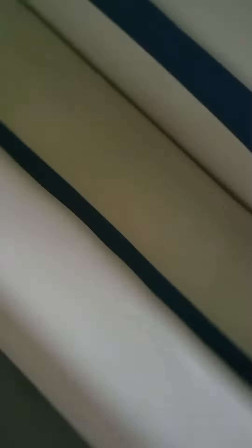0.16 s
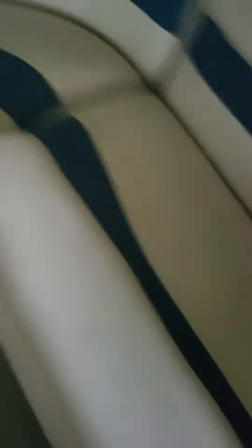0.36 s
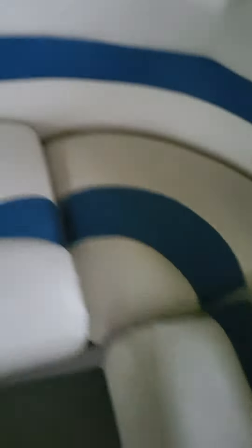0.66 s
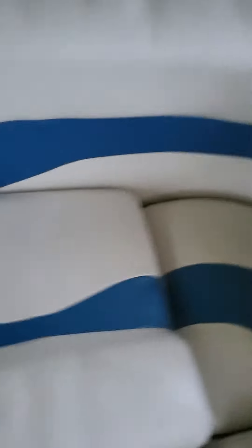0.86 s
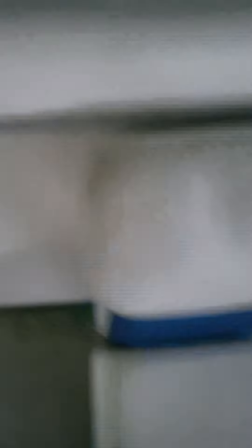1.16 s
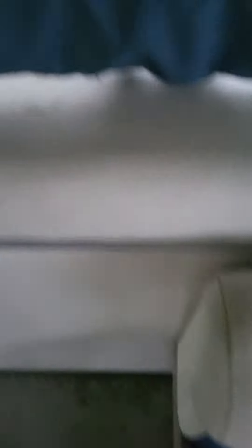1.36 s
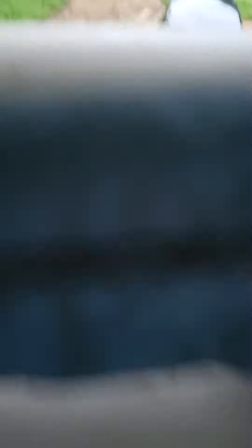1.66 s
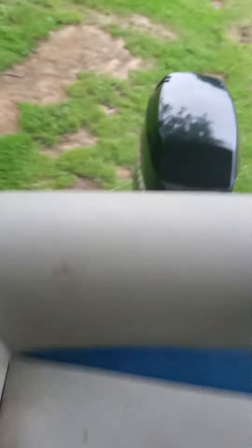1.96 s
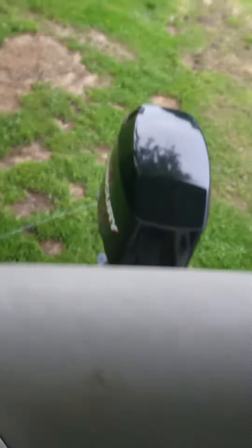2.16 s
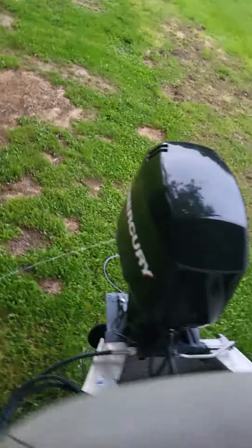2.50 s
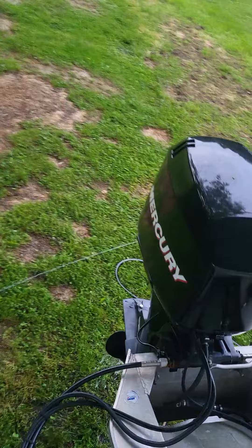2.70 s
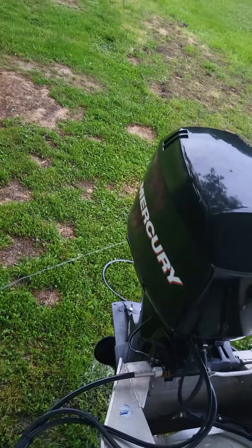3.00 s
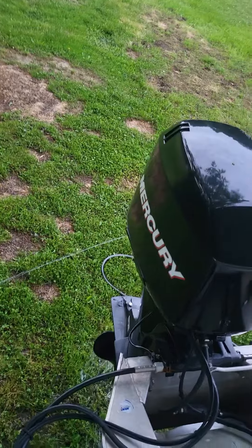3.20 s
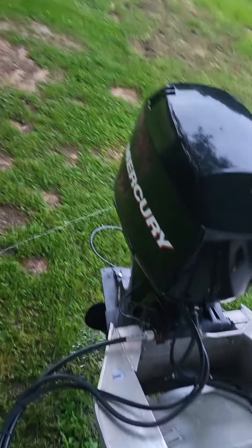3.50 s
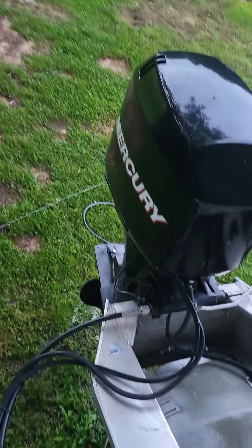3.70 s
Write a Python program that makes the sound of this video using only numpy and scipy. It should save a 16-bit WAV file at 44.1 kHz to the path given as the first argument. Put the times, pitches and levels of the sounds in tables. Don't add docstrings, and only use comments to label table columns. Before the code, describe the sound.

A boat outboard motor idles steadily, throbbing low with clattering metal, watery gurgles and hiss.

```python
import sys
import numpy as np
from scipy import signal
from scipy.fft import rfft, irfft, next_fast_len
from scipy.io import wavfile
from scipy.ndimage import uniform_filter1d

SR = 44100
rng = np.random.default_rng(int(sys.argv[2]) if len(sys.argv) > 2 else 0)


def digitize_waveform(pressure):
    field = np.atleast_2d(pressure).T
    bounded = np.clip(field, -1, 1)
    quanta = np.round(bounded * 32767).astype(np.int16)
    wavfile.write(sys.argv[1], SR, quanta)


def ratio(d):
    e = np.asarray(d, float) / 20
    return 10 ** e


N = 169785

# pulse level in dB, lateness in firings, clatter level in dB.
CYLINDERS = [
    (0, 0, -1),
    (.6, .006, -1),
    (0, 0, 0),
    (-.6, -.006, -4),
]
# time in seconds, exhaust heard straight in dB, boom of the hull in dB, machinery in dB.
ROUTE = [(0, -17.5, -21, -3.5), (.25, -32.5, -20.5, -4), (.45, -25, -17, -3), (.7, -25.5, -19.5, -3.5),
         (.95, -20.5, -22, -1.5), (1.3, -20.5, -22.5, -1), (1.55, -20.5, -19.5, -2), (1.9, -17, -22, -1),
         (2.15, -16, -24, 0.5), (2.45, -16, -23, 1), (2.8, -17.5, -22.5, 4), (3.3, -19, -21, 5.5),
         (3.85, -18, -22, 5)]
HALVES = np.array([[.5], [-.5]])


def unit(x):
    return x / np.sqrt(np.mean(x ** 2, -1, keepdims=True) + 1e-20)


def along(points, hz):
    f, db = np.transpose([(5, -90), *points, (points[-1][0] * 3, -90)])
    return ratio(np.interp(np.log(hz + 1), np.log(f + 1), db))


def curves(rows):
    s, *cols = np.transpose(rows)
    return [np.interp(np.arange(N) / SR, s, c) for c in cols]


def filtered(x, response):
    m = next_fast_len(N + SR // 2) // 2 * 2
    return irfft(rfft(x, m) * response(np.fft.rfftfreq(m, 1 / SR)), m)[..., :N]


def causal(points):
    def response(hz):
        c = irfft(np.log(along(points, hz)))
        c[1:len(c) // 2] *= 2
        c[len(c) // 2 + 1:] = 0
        return np.exp(rfft(c))
    return response


def resonance(hz, width):
    return lambda f: 1j * f * width / (hz * hz - f * f + 1j * f * width)


def noise(points, patchy_db=1.5):
    z = signal.stft(rng.standard_normal(N), nperseg=256)[2]
    field = uniform_filter1d(rng.standard_normal(z.shape), size=4, axis=0)
    field = uniform_filter1d(field, size=10, axis=1)
    x = signal.istft(z * ratio(patchy_db * field / field.std()), nperseg=256)[1][:N]
    return unit(filtered(x, lambda hz: along(points, hz)))


def pair(a, b, alike):
    u = np.arccos(np.clip(alike, 0, 1)) / 2
    return np.cos(u) * a + np.sin(u) * b * np.array([[1], [-1]])


def firings():
    # time in seconds, firings per second.
    speed = [(0.0, 24.95), (0.26, 26.19), (0.51, 26.36), (0.77, 26.0), (1.03, 26.48), (1.28, 26.46),
             (1.54, 26.5), (1.8, 26.18), (2.05, 26.06), (2.31, 26.18), (2.57, 26.42), (2.82, 26.74),
             (3.08, 26.11), (3.34, 27.06), (3.59, 26.95), (3.85, 25.17)]
    return np.cumsum(curves(speed)[0]) / SR


def bursts(bed, rise_s, fall_s, scatter_db):
    turn = firings() - 0.38 + 4
    k = turn.astype(int)
    s = (turn - k) / 26.4
    chance = np.sqrt(3) * rng.uniform(-1.57, 1, k[-1] + 1)
    size = ratio(np.array(CYLINDERS)[k % 4, 2] + scatter_db * chance[k])
    return unit(abs(bed) + 2 * size * (1 - np.exp(-s / rise_s)) * np.exp(-s / fall_s))


def rings(rows, gain_db, t60=.048, rough=.75, turn=np.pi / 2, left_db=0):
    out, t = np.zeros((2, N + SR)), np.arange(SR // 8) / SR
    fade = ratio(-60 * (t / t60) ** 1.4) * (1 - np.exp(-t / .004))
    for s, db, hz in rows:
        drift = rough * np.cumsum(rng.standard_normal((2, len(t))), 1) / 10
        ring = np.sin(2 * np.pi * hz * t + drift + [[0], [turn]]) * fade
        pan_db = (left_db + 5 * rng.standard_normal()) * HALVES
        out[:, round(s * SR):][:, :len(t)] += ratio(db + gain_db + pan_db) * 1.46 * ring
    return out[:, :N]


def exhaust():
    # frequency in Hz, level in dB.
    pipe = [(26, -25.5), (50, 7), (80, 4.5), (106, 5), (132, 3), (158, -10), (186, -24), (260, -34.5)]
    # frequency in Hz, width in Hz, level in dB.
    boom = [
        (72.4, 18.9, 1.5),
        (127.6, 5.4, 2.5),
        (179.9, 13, 5),
    ]
    pulse_place, jitter, scatter_db = 0.265, .006, .8
    lag_hz = 40
    lead = SR // 4
    k = np.arange(-4, 106)
    chance, own = rng.standard_normal((len(k), 2)), np.array(CYLINDERS)[k % 4]
    place = k + pulse_place + own[:, 1] + jitter * chance[:, 0]
    at = np.interp(place, np.r_[-6.3, firings()], np.r_[0, lead + np.arange(N)], right=0)
    size = ratio(own[:, 0] + scatter_db * chance[:, 1]) * (at > 0)
    pulses = np.bincount(at.astype(int), size, N + lead)

    def leg(f):
        return causal(pipe)(f) * (lag_hz - 1j * f) / (lag_hz + 1j * f)

    def hull(f):
        modes = [ratio(db) * resonance(hz, width)(f) for hz, width, db in boom]
        return leg(f) * sum((-1) ** i * mode for i, mode in enumerate(modes))

    def heard(response, lag_s, left_db):
        thump = filtered(np.arange(N) == 0, response)[:lead]
        x = unit(-signal.fftconvolve(pulses, thump)[lead:lead + N])
        return ratio(HALVES * left_db) * filtered(x[None], lambda hz: np.exp(2j * np.pi * hz * lag_s * HALVES))

    straight_db, boom_db, _ = curves(ROUTE)
    straight = ratio(straight_db) * heard(leg, lag_s=0.00014, left_db=1.6)
    return straight + ratio(boom_db) * heard(hull, lag_s=0.00037, left_db=1.5)


def clatter():
    # frequency in Hz, width in Hz, level in dB, left over right in dB.
    block = [(870, 61, -17, 15), (1070, 41, -7, 3), (1448, 41, -9, 0), (2234, 37, -11.5, -6),
             (2410, 145, -8.5, 1), (2603, 17, -14.5, 5.5), (3023, 36, -16, -3), (3380, 200, -17, 15),
             (3640, 47, -10.5, -7), (3950, 16, -12.5, -1.5), (4286, 230, -8.5, -3.5)]
    out = np.zeros((2, N))
    for hz, width, db, pan_db in block:
        gate = bursts(bed=.1, rise_s=.005, fall_s=.012, scatter_db=2.5)
        shake = gate * rng.standard_normal((2, N))
        sound = unit(filtered(shake, lambda f: resonance(hz, 2 * width)(f) ** 2))
        out += ratio(db + pan_db * HALVES) * pair(*sound, alike=0.028)
    return ratio(-41.5 + curves(ROUTE)[2]) * out


def tappet():
    # time in seconds, peak in dB, frequency in Hz, peak of the higher ring in dB.
    knocks = [(0.1023, -45, 1120, -63), (0.2523, -34, 1094, -38.5), (0.406, -34.5, 1193, -44),
              (0.555, -38, 1024, -41), (0.711, -29, 1110, -29.5), (0.8652, -25.5, 1085, -40),
              (1.0142, -38, 1070, -62), (1.163, -29, 1183, -39), (1.3139, -31.5, 1163, -63),
              (1.4653, -35, 1165, -56), (1.6212, -22, 1021, -38), (1.7749, -31, 1064, -33),
              (1.8869, -30, 1010, -46), (2.074, -31, 1140, -36.5), (2.2334, -38, 1115, -26.5),
              (2.38, -36, 1030, -34), (2.5306, -29, 1150, -34.5), (2.6817, -22, 1120, -30),
              (2.833, -18.5, 1075, -37), (2.984, -21, 1052, -35.5), (3.1316, -26, 1043, -45),
              (3.2875, -24.5, 1040, -34), (3.43, -24.5, 1080, -47), (3.583, -24, 990, -33),
              (3.7328, -22, 1040, -26)]
    # time in seconds, peak in dB, frequency in Hz.
    pings = [(2.174, -28, 812), (2.5, -27.5, 2600), (1.6, -26, 2650), (1.3, -25, 1600), (0.44, -30, 1400),
             (0.81, -33, 1300), (1.9, -42, 2700), (2.7, -22, 2330), (1.4, -29, 2200), (1.9, -25.5, 2326),
             (2.7, -25.5, 2400), (4.6, -30, 2380), (3.4, -34, 2330), (2.99, -42, 2400)]
    low = [row[:3] for row in knocks]
    upper = [(s + 0.0037, db + 4.5, 2384) for s, _, _, db in knocks]
    return rings([*low, *upper, *pings], gain_db=0)


def cowl_rattles():
    # time in seconds, peak in dB, frequency in Hz.
    rattles = [(0.828, -44, 4270), (1.5145, -26, 3620), (2.3096, -27, 3670), (2.3835, -29, 3640),
               (2.4887, -27, 4230), (2.6155, -31, 3600), (2.7641, -35, 3700), (2.8384, -27, 3970),
               (2.9178, -36, 3930), (2.9527, -30, 3670), (2.9911, -26, 3610), (3.0649, -24, 3480),
               (3.1088, -22.5, 4220), (3.2216, -23, 3650), (3.2919, -26.5, 3970), (3.3348, -25, 3600),
               (3.3702, -23, 3640), (3.4436, -25, 4260), (3.5887, -30, 4360), (3.8152, -32, 3650)]
    return rings(rattles, gain_db=-6, rough=0.95, left_db=-8)


def linkage_clinks():
    # time in seconds, peak in dB, frequency in Hz.
    clinks = [(1.3239, -46, 1400), (1.926, -36.5, 1394), (2.0408, -39, 1460), (2.162, -32, 1600),
              (2.2408, -33, 1420), (2.2734, -37, 1464), (2.9556, -36, 1450), (3.07, -36, 1460),
              (3.1363, -30, 1413), (3.586, -30, 1404), (3.701, -54, 1520), (3.7366, -34, 1390)]
    return rings(clinks, gain_db=2.5)


def valve_spits():
    # time in seconds, peak in dB, frequency in Hz.
    spits = [(2.1591, -24.5, 7080), (2.4235, -27, 6580), (2.5023, -25.5, 6610), (2.6145, -30, 6280),
             (2.8001, -24.5, 5830), (2.9164, -21.5, 5700), (3.0326, -22.5, 6130), (3.1443, -31, 5570),
             (3.2212, -27.5, 6450), (3.2975, -24, 6020), (3.3324, -23, 6500), (3.4023, -27, 6130),
             (3.4816, -24.5, 6600), (3.5145, -22, 6000)]
    return rings(spits, gain_db=-4.5, rough=2.48, left_db=-8)


def gas_burps():
    # time in seconds, peak in dB, frequency in Hz.
    burps = [(0.79, -36, 448), (0.937, -36, 377), (1.051, -25, 388), (1.205, -31.5, 373),
             (1.391, -25.5, 460), (1.808, -27, 404), (1.847, -25, 447), (1.927, -24, 434),
             (1.997, -26.5, 457), (2.042, -29, 393), (2.088, -27.5, 450), (2.152, -24, 392),
             (2.187, -38, 406), (2.24, -28, 444), (2.347, -32, 377), (2.414, -32, 359), (2.496, -31, 347),
             (3.06, -32, 447), (3.215, -29, 460), (3.364, -26, 450), (3.663, -21, 468), (3.745, -33, 416)]
    return rings(burps, gain_db=-4, t60=0.11, rough=.375, turn=np.pi / 8)


def gurgle():
    # frequency in Hz, level in dB per Hz.
    churn_colour = [(150, -0.5), (330, -9), (520, -6.5), (600, -14), (900, -14), (2000, -25.5)]
    # frequency in Hz, width in Hz.
    leg_modes = [
        (278, 33.6),
        (395, 118),
        (462, 34),
    ]
    # time in seconds, then the level of each of the three resonances in dB.
    leg_heard = [(0, -17, -2.5, -0.5), (.8, -1, 2, 2), (1.1, -9, 5, -4), (1.7, -4.5, 6, 7),
                 (2.3, -20, 11.5, -1.5), (2.6, 5, 0.5, -4), (3.2, 3, -4, 4), (3.85, 2.5, 0, 11)]
    alike = 0.66

    def swell(scatter_db):
        return bursts(bed=.35, rise_s=.004, fall_s=.015, scatter_db=scatter_db)

    churn = pair(noise(churn_colour, patchy_db=1), noise(churn_colour, patchy_db=7.5), alike)
    out = swell(1.2) * ratio(-41 + curves(ROUTE)[2]) * churn
    for (hz, width), db in zip(leg_modes, curves(leg_heard)):
        shake = swell(1.5) * rng.standard_normal((2, N))
        tone = unit(filtered(shake, lambda f: resonance(hz, width)(f) ** 2))
        out += ratio(-47 + db) * pair(*tone, alike)
    return out


def hiss():
    # time in seconds, hiss in dB, dullness of the right port from 0 (bright) to 1 (dull).
    facing = [(0, 0, 0.03), (.3, 3.5, 0.018), (1.02, 1, 0.091), (1.15, 1.5, 0.39), (1.55, 1.5, 0.55),
              (1.65, 4, 0.02), (2.04, 4.5, 0.18), (2.12, 6.5, 0.51), (2.8, 7, 0.76), (3.4, 6, 0.97),
              (3.85, 5.5, 0.53)]
    # frequency in Hz, level in dB per Hz.
    left_colour = [(700, -11), (1900, -9), (4500, -8), (8200, -8.5), (9200, -16.5), (11000, -17.5),
                   (13000, -12), (15800, -21)]
    bright_colour = [(700, 4), (1900, -7.5), (5000, -18), (7700, -1), (9300, -12), (11300, -17.5),
                     (13000, -8.5), (15800, -5.5)]
    dull_colour = [(700, -10.5), (1900, -5.5), (4900, -2), (6000, 7.5), (8000, -6.5), (10300, -19),
                   (12800, -7.5), (15800, -23)]
    spray_hz = 10100
    level_db, dull = curves(facing)
    dull = np.clip(dull, 0, 1)
    white = np.array([noise([(100, 0), (20000, 0)], patchy_db=2) for _ in range(2)])
    low = filtered(white, lambda hz: 1 / (1 + (hz / spray_hz) ** 8))

    def gate(bed):
        return bursts(bed, rise_s=0.016, fall_s=0.012, scatter_db=2.6)

    def port(x, colour):
        return filtered(x, lambda hz: along(colour, hz))

    raw = gate(0.48) * low + gate(0.55) * (white - low)
    right = np.sqrt(1 - dull) * port(raw[1], bright_colour)
    right += np.sqrt(dull) * port(raw[1], dull_colour)
    return ratio(-36 + level_db) * np.array([port(raw[0], left_colour), right])


def handling():
    # start in seconds, length in seconds, level in dB, top frequency in Hz.
    puffs = [
        (.05, .5, -38, 120),
        (.8, .12, -42, 350),
        (2.152, .16, -30.5, 600),
    ]
    out, t = np.zeros((2, N)), np.arange(N) / SR
    for s, length, db, top_hz in puffs:
        u = np.clip((t - s) / length, 0, 30)
        colour = [(40, -6), (top_hz / 3, 0), (top_hz, -8), (top_hz * 2.5, -24)]
        lumps = [noise(colour, patchy_db=2) for _ in range(2)]
        swell = 3 * (1 - np.exp(-20 * u)) * np.exp(-2 * u)
        out += ratio(db) * swell * pair(*lumps, alike=0.63)
    tick_s, tick_t60 = .831, .008
    tick = ratio(-19 - 60 * abs(t - tick_s) / tick_t60) * rng.standard_normal((2, N))
    return out + tick * [[.4], [1]]


def scene():
    engine = exhaust() + clatter() + tappet()
    small_parts = cowl_rattles() + linkage_clinks() + valve_spits()
    water = gas_burps() + gurgle() + hiss()
    return engine + small_parts + water + handling()


def top_cut(x):
    return signal.sosfilt(signal.butter(12, 15860, fs=SR, output="sos"), x)


def record(dry):
    top_hz = 15870
    mix = filtered(dry, lambda hz: hz < top_hz)
    return top_cut(mix)


dry = scene()
out = record(dry)
digitize_waveform(out)
```